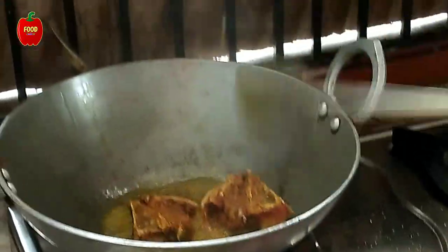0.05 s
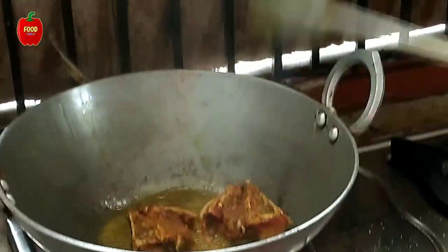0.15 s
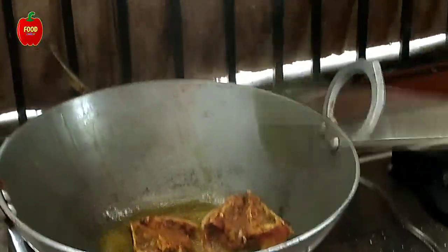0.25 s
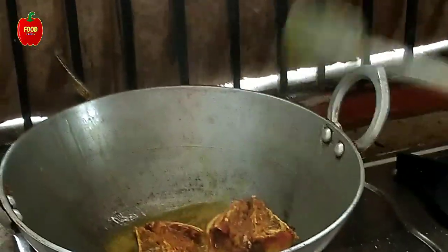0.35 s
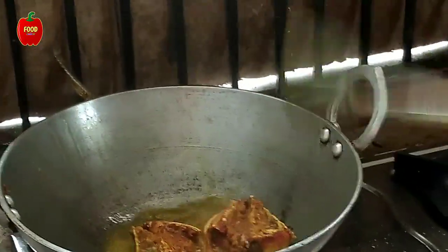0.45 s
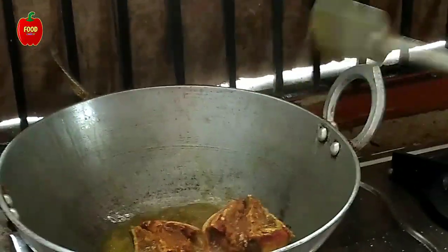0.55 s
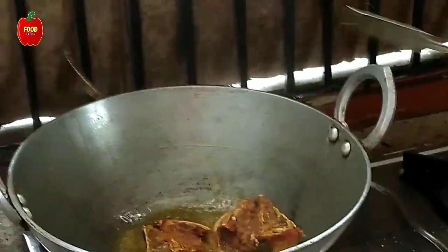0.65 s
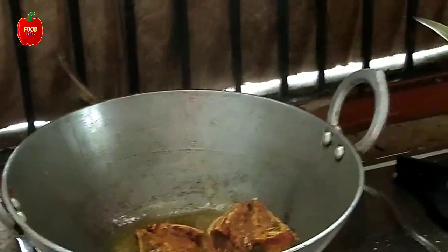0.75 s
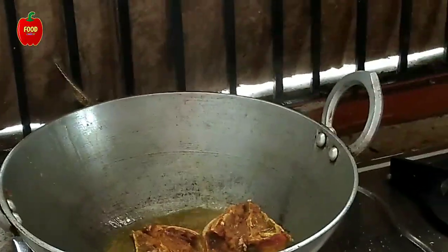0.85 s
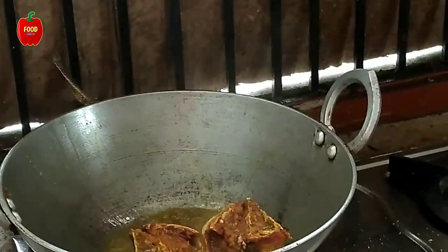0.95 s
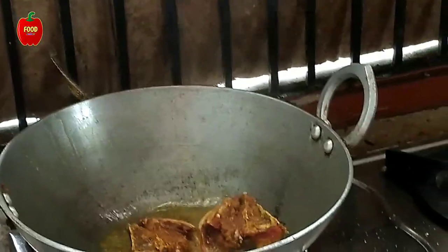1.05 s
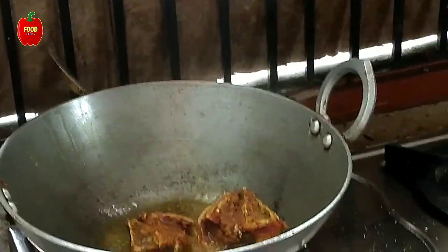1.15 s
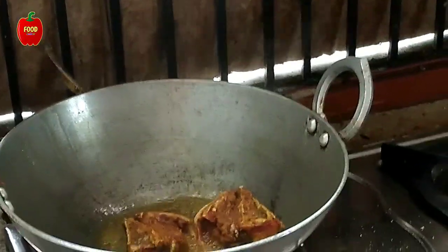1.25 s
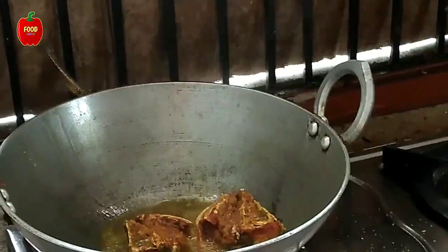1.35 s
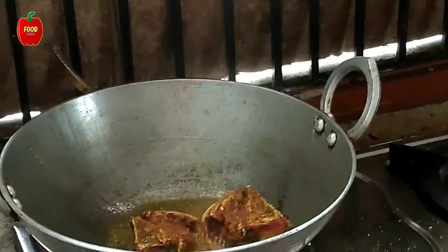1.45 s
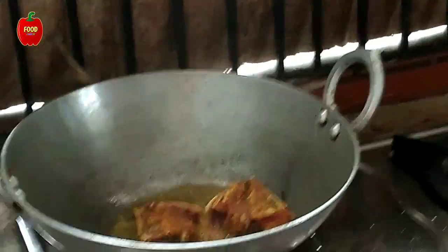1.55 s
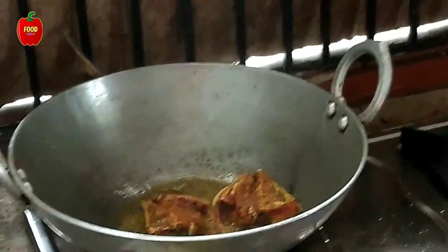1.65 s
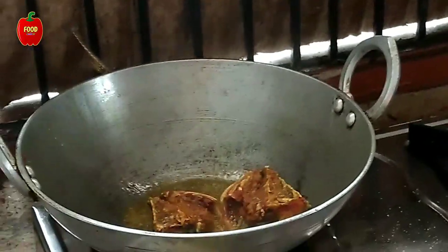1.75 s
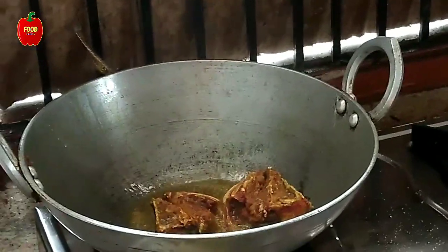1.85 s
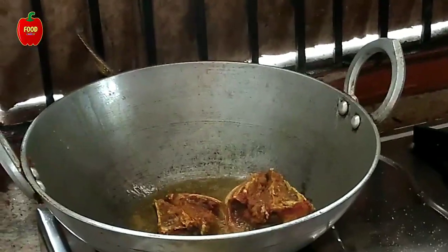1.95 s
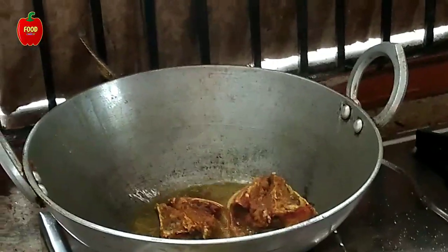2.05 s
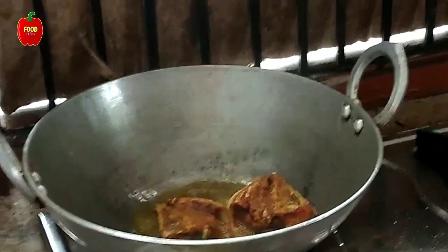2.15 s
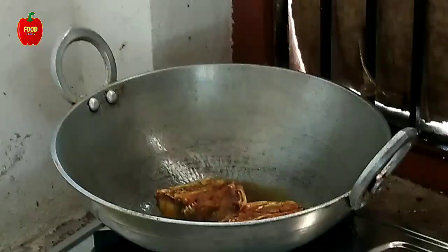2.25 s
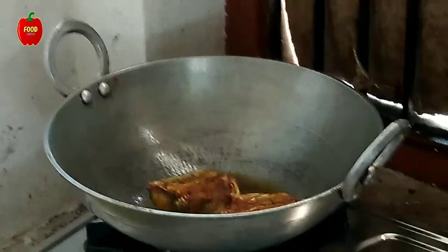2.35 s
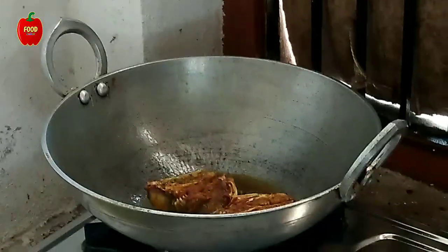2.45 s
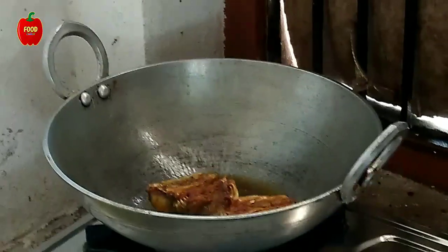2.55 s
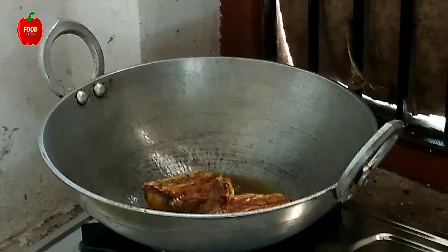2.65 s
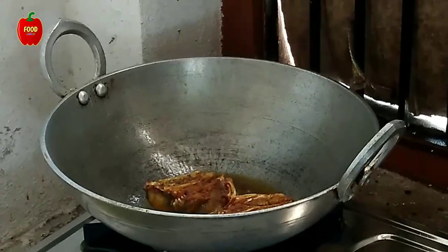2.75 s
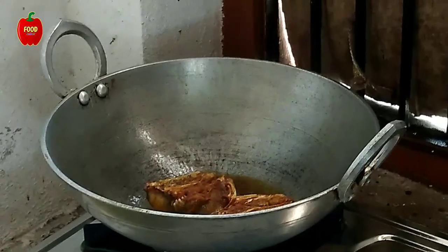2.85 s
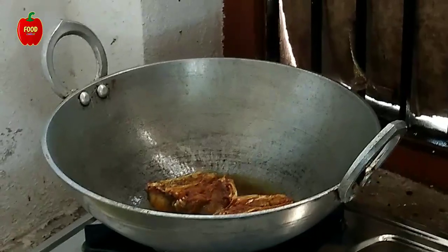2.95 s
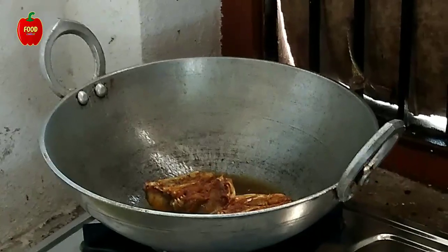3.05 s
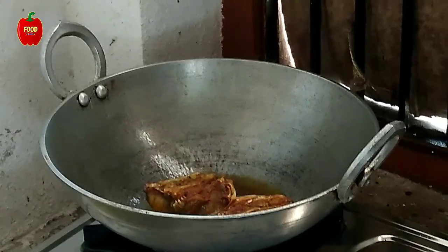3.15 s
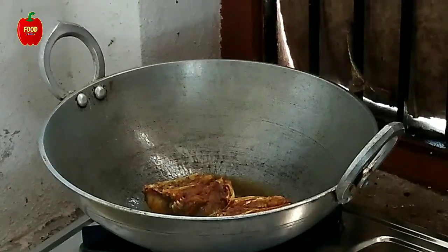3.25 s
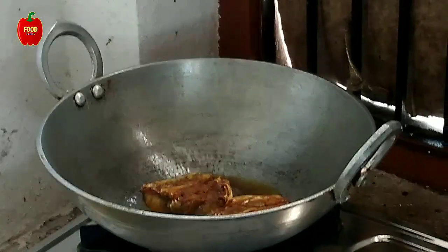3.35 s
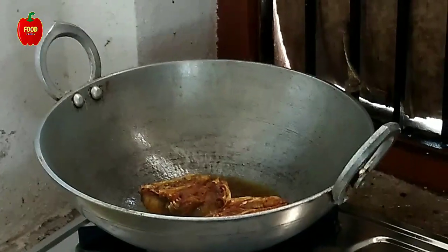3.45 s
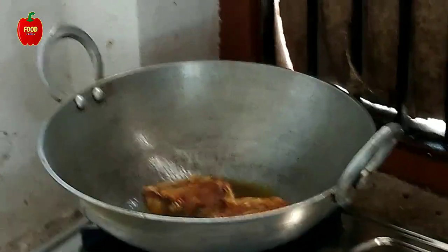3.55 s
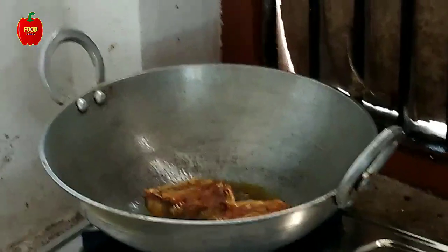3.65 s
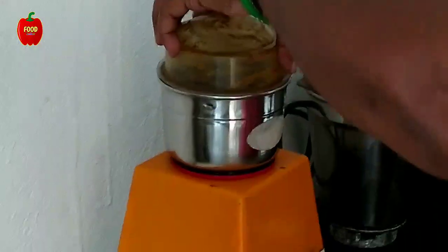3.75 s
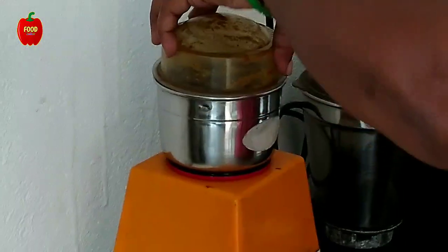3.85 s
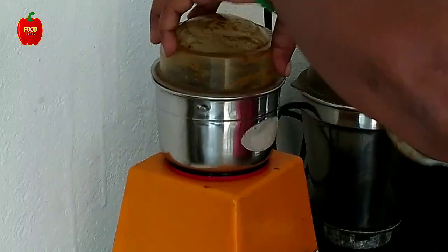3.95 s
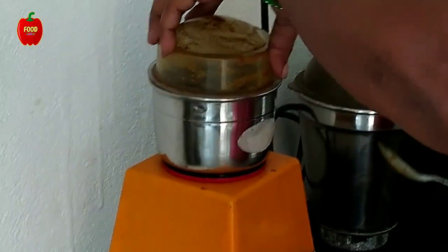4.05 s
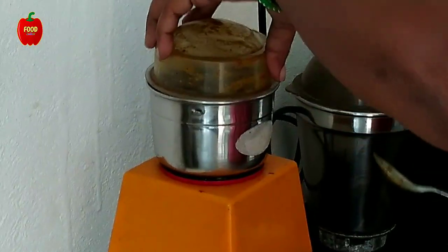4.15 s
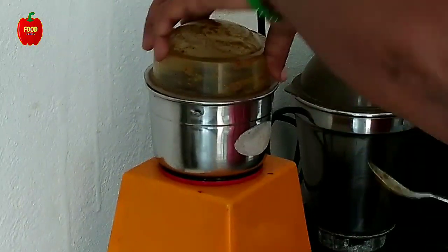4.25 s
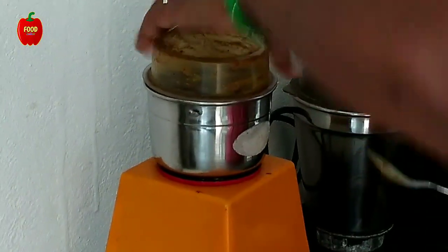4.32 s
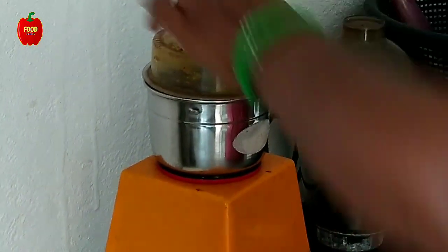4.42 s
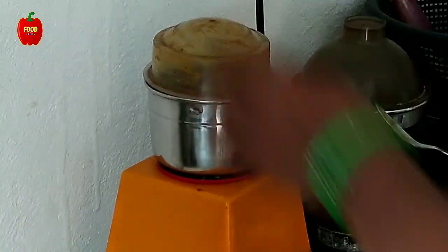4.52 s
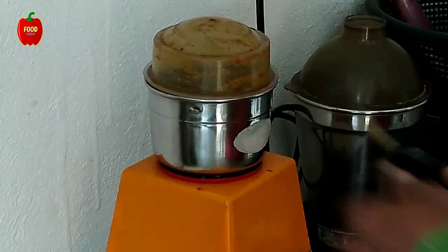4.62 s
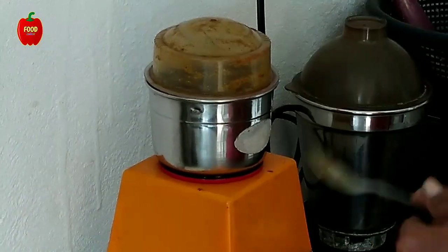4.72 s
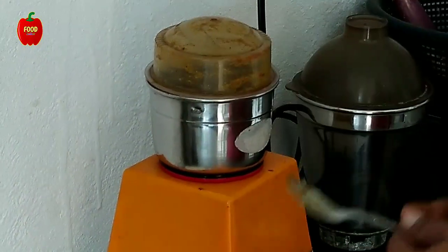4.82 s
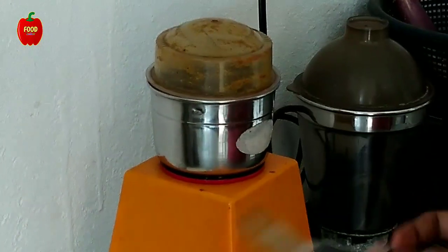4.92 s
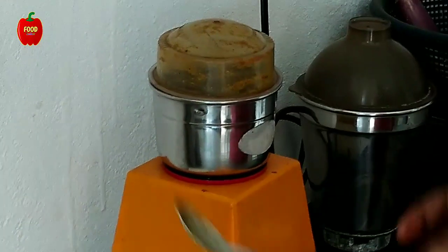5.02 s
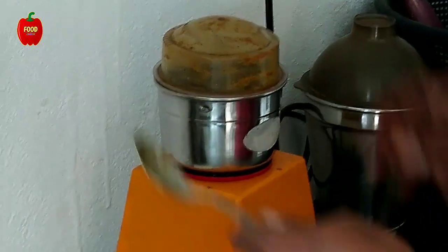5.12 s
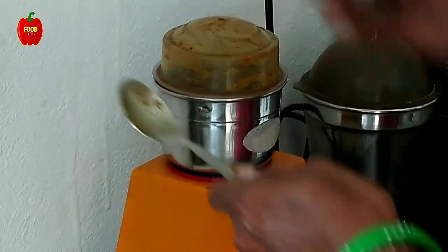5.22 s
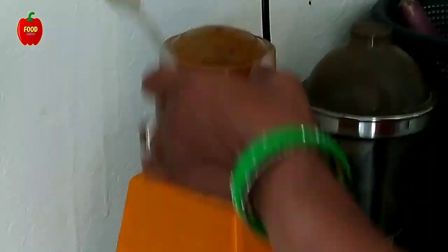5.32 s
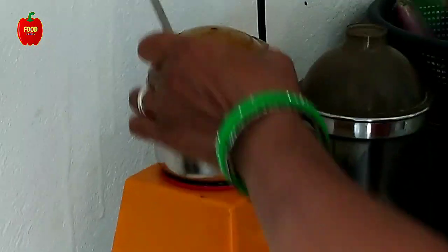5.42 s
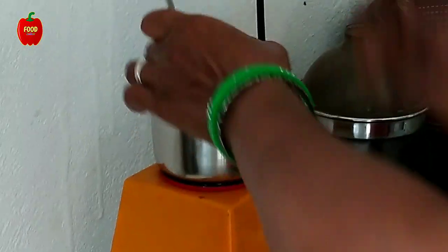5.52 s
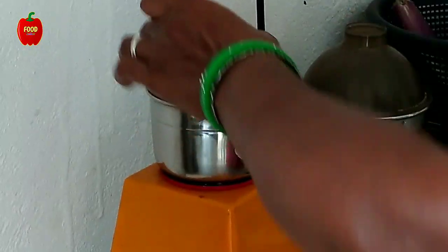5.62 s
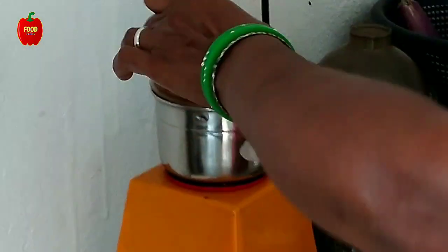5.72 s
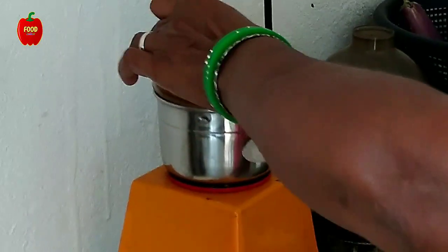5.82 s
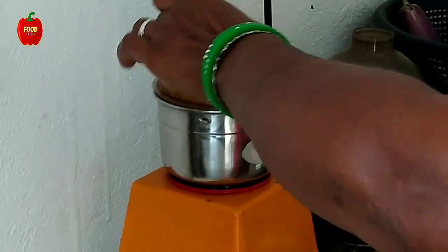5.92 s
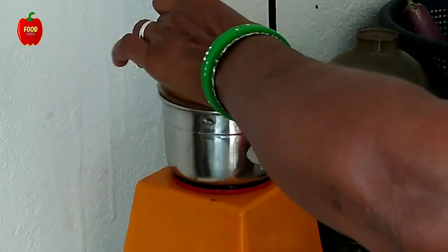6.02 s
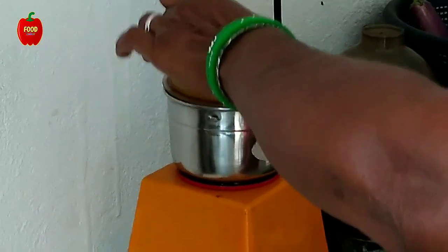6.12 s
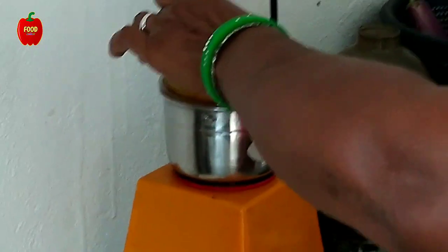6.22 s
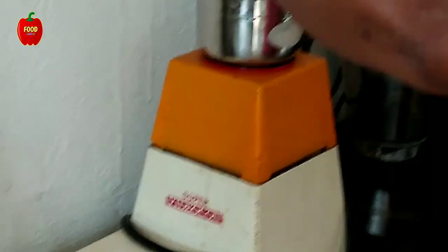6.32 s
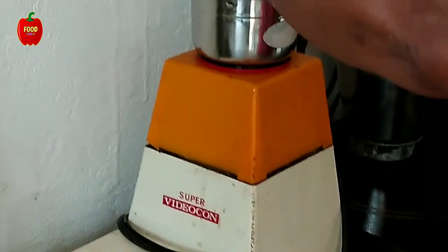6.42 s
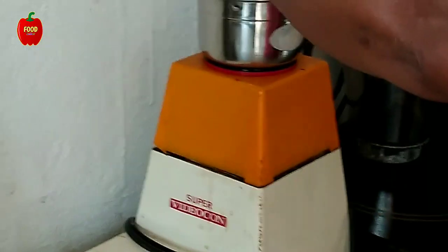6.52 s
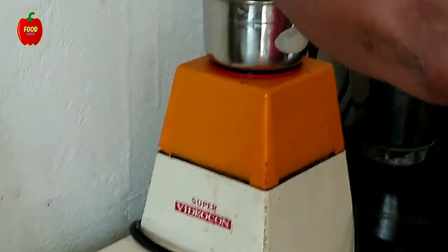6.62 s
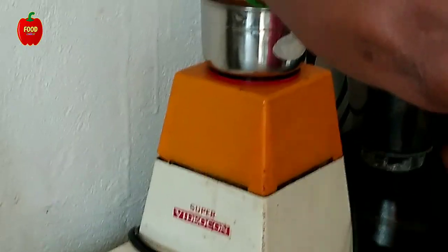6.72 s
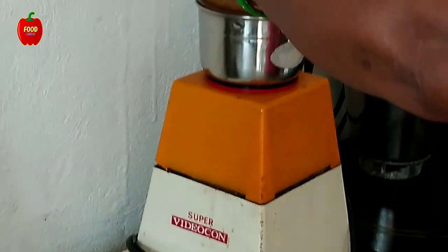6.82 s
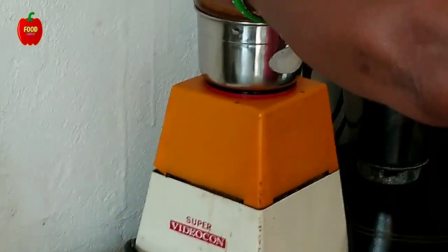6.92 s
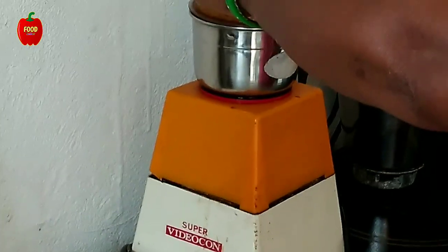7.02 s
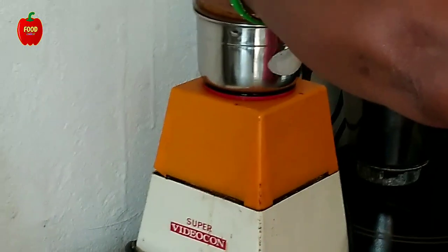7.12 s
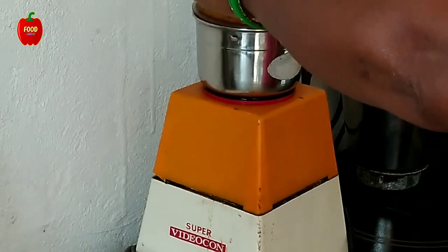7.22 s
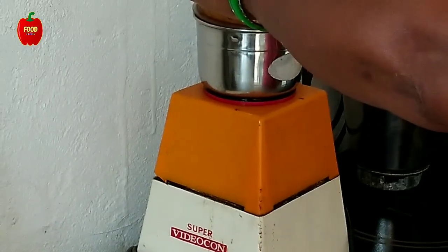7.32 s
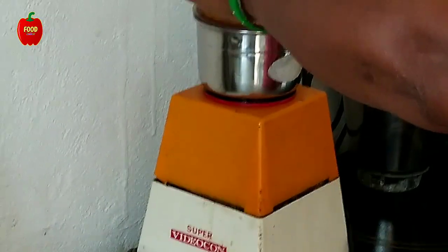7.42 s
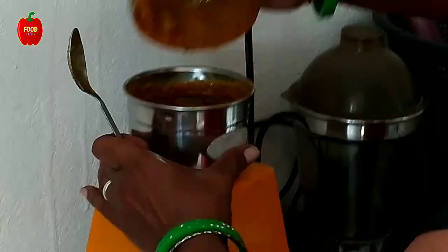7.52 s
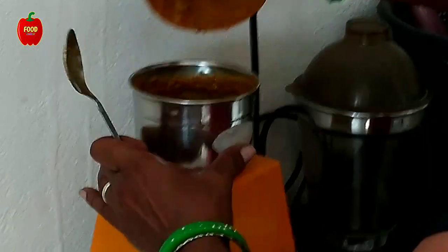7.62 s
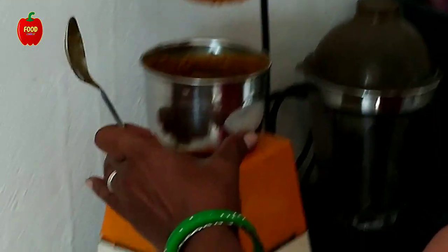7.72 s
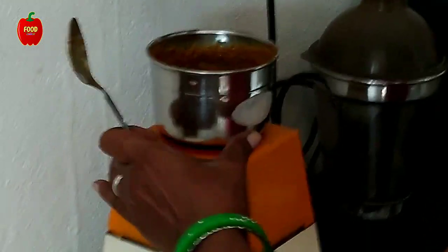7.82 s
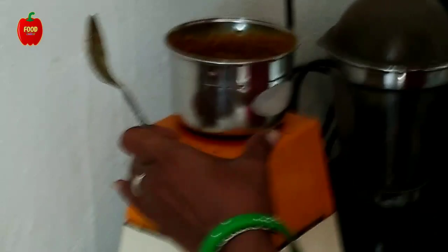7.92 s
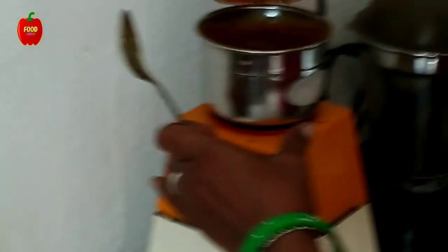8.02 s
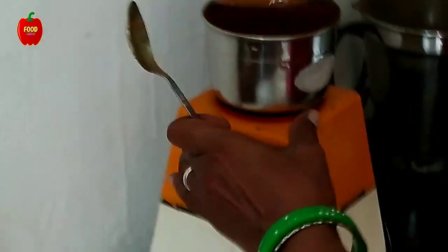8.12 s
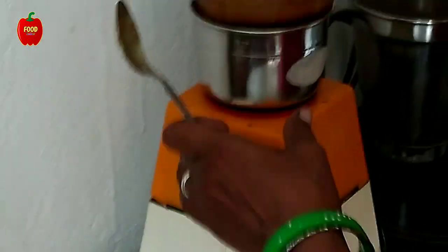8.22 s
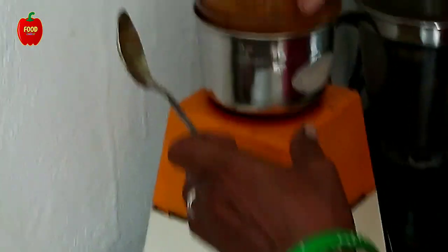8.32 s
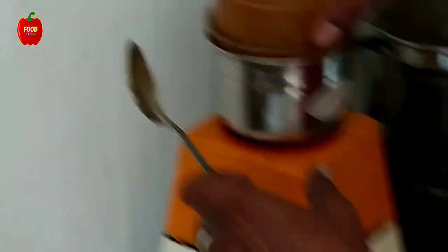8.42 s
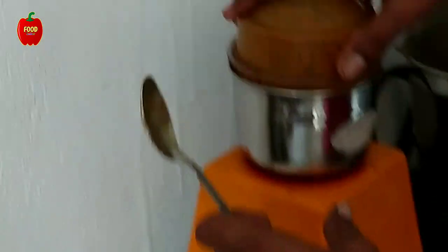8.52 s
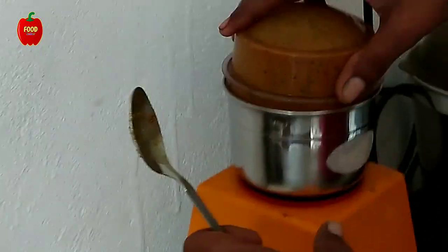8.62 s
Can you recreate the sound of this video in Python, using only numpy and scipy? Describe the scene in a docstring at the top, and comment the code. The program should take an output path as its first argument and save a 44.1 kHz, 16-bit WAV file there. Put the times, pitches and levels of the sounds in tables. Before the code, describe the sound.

Fish sizzles loudly in oil with spatula knocks on a steel pan, then fades across the kitchen as a mixer grinder whines, roars and slows down.

```python
"""Fish fries in oil in a round steel pan, heard close by while a spatula scrapes and knocks and water spits,
then from one side, then from across the kitchen, where a fan hums and a plastic lid is handled.
A mixer grinder starts, whines up to speed, is switched off and slows until it is cut off; the frying goes on.
Noise grains make the sizzle and grinding, struck resonances the knocks, shaft-locked sines the whine;
a pair of microphone ports hears it all."""
import sys
import numpy as np
from scipy import signal
from scipy.io import wavfile

SR = 44100
rng = np.random.default_rng(int(sys.argv[2]) if len(sys.argv) > 2 else 0)


def magnitude_from_level(level_db):
    """Linear magnitude for a level in decibels (20 dB per decade)."""
    exponent = np.asarray(level_db, float) / 20
    return 10 ** exponent


def file_out(sig):
    """Save sig as 16-bit WAV at sys.argv[1]."""
    # one column per channel
    cols = np.atleast_2d(sig).T
    # limit, then scale
    lim = np.clip(cols, -1, 1)
    pcm = np.round(lim * 32767).astype(np.int16)
    wavfile.write(sys.argv[1], SR, pcm)


N = 382347

# Times in seconds at which the microphone moves to a new standpoint.
MOVES_S = [2.12, 3.555, 6.5]
# Sizzle level. Each row: time in seconds, level in dB.
SIZZLE_LEVEL = [(0, -22.5), (1.1, -24.5), (2.115, -25.5), (2.125, -29.5), (2.5, -30), (2.6, -28),
                (3.05, -27.5), (3.548, -27.5), (3.56, -37.5), (4.1, -37.5), (4.45, -36.5), (5.1, -37),
                (7.3, -37.8), (8.67, -37.5)]
# Colour of the sizzle at each standpoint. Each row: frequency in Hz, relative density in dB per Hz.
SIZZLE_NEAR = [(210, -66), (350, -36), (493, -20), (525, -21.5), (567, -15), (623, -7), (799, -18),
               (878, -13.5), (1640, -11), (2740, -1.5), (4300, 0), (4950, -9.5), (8400, 4), (13400, -14),
               (14500, 3)]
SIZZLE_ASIDE = [(210, -54), (350, -33), (471, -19), (517, -28), (594, -9), (891, -12.5), (1320, -11.5),
                (2530, 1.5), (3050, -1.5), (4580, 0), (5350, -7), (8020, 3), (10100, -5.5), (13600, -13.5),
                (14500, -18)]
SIZZLE_FAR = [(210, -49), (350, -28), (422, -25), (604, -17), (763, -18.5), (1490, -18), (2450, -7),
              (3400, -11), (4440, -4), (5520, -13), (7190, -3), (8020, -4.5), (9820, -2.5), (11300, -15.5),
              (14500, -12.5)]
SIZZLE_LATE = [(210, -17.5), (350, -16), (525, -14.5), (695, -12), (1110, -14), (1690, -12.5), (2170, 1.5),
               (2610, -7.5), (3200, -5), (4370, -1), (6970, -6), (8020, 2), (9670, -3), (11000, -6.5),
               (14500, -12.5)]
# Port balance at the standpoints. Each row: frequency in Hz, left minus right in dB.
SIDES_NEAR = [(60, 9.0), (110, 28), (200, 40), (380, 10), (690, 0), (1270, -0.5), (2350, 1), (4330, -2),
              (7980, -2.5), (14700, 8)]
SIDES_ASIDE = [(60, 9.5), (110, 9.5), (200, 12.5), (380, 5), (690, 1.5), (1270, -1.5), (2350, -0.5),
               (4330, -3), (7980, -1.5), (14700, 15)]
SIDES_FAR = [(60, 15), (92, 14), (140, 12.6), (210, 15.3), (330, 14.7), (500, 1.5), (760, 1.0), (1160, 1.5),
             (1770, 9.8), (2710, 8), (4130, 1.3), (6310, 1.2), (9630, 11.5), (14700, 8.9)]
# Port balance of the mixer. Each row: frequency in Hz, left minus right in dB.
SIDES_MIXER = [(60, -4), (92, 13), (140, 21), (210, 11.5), (330, 13.5), (500, -2), (760, -1), (1160, -0.5),
               (1770, -4), (2710, 3), (4130, 0), (6310, -6.5), (9630, 6.5), (14700, 4)]
# Left-right likeness of pan and mixer. Each row: frequency in Hz, likeness 0-1.
ALIKE_PAN = [(60, 0.1), (130, 0.73), (220, 0.24), (600, 0.9), (900, 0.47), (1300, 0), (2500, .05),
             (8000, 0)]
ALIKE_MIXER = [(60, .35), (130, 1), (250, 1), (600, 0.69), (900, 0.75), (1300, 0.25), (2500, 0.13),
               (3500, 0.029), (8000, .02)]
# The oil flares up or slackens. Each row: centre in seconds, change in dB, length in seconds.
FLARES = [(.405, 1.5, 0.039), (.665, 0.5, 0.16), (1.017, 1.5, 0.074), (1.36, 0.5, .15), (1.942, 2, .08),
          (2.92, 0.5, 0.042), (3.216, 1, 0.059), (3.386, 0.5, 0.05), (3.686, -1.5, .06), (3.79, 2, 0.092),
          (3.895, -1.5, 0.053), (4.202, 1, .1), (4.345, -0.5, 0.042), (4.38, 0.5, 0.046),
          (4.537, 2.5, 0.11), (4.8, 0, .08), (4.905, -1, .06), (7.44, 1, 0.033), (7.874, 0.5, 0.13),
          (8.297, 2, .12), (8.375, -2, 0.062), (8.46, 2.5, 0.046), (8.56, 0.5, .06)]
GUSTS_DB, GUSTS_HZ = 0.52, 18
# Water spits in the oil; the first row is a short scrape.
# Each row: start in seconds, relative peak in dB, pitch in Hz, T60 in seconds.
SCRAPE_AND_SPITS = [(.398, -25, 2300, 0.23), (1.906, -19, 2700, 0.02), (1.94, -24, 3070, 0.053),
                    (3.93, -30, 7400, .02), (4.036, -26, 6550, .02), (4.16, -26, 9470, .015),
                    (4.2, -29, 4430, 0.052), (4.473, -31, 7100, .03)]

# Blows on the pan. Each row: time in seconds, relative peak in dB, dullness 0-1.
KNOCKS = [(0.205, -8, 0.66), (0.265, -20, 0.7), (0.311, -21, 0.1), (0.389, -22.5, 0.3), (0.629, -21.5, 0.7),
          (0.925, -28.5, 0.5), (1.318, -17.5, 0.9), (1.353, -18, 1), (1.425, -25, 0), (1.934, -33, 0.7),
          (2.099, -32, 0), (2.741, -31.5, 0.1), (2.92, -28, 0.2), (2.95, -26, 0.5), (3.36, -28, 0.2)]
# Modes of the pan. Each row: frequency in Hz, relative level in dB, T60 in seconds.
PAN_MODES = [(127, 6, 0.18), (185, -4.5, 0.16), (280, -14, .08), (350, -6.5, 0.046), (430, -5, 0.2),
             (511.5, 7, 0.035), (594, 2.5, 0.21), (650, 11, 0.055), (756, 2, 0.058), (853, 3.5, 0.055),
             (1040, 4.5, 0.015), (1320, -6.5, 0.039), (1555, -5, 0.029), (1760, -11.5, 0.016),
             (2300, 0, 0.01)]
CONTACT_S = 0.0007
ECHO_T60_S, ECHO_DB = 0.36, 1.5

# Shaft speed while powered. Each row: time in seconds, speed in turns per second.
SHAFT_SPEED = [(5.13, 160), (5.19, 183), (5.3, 197.5), (5.36, 208), (5.45, 219), (5.55, 227.5), (5.66, 234),
               (5.85, 240.5), (6.085, 244.8)]
SWITCH_OFF_S, CUT_OFF_S = 6.07, 7.318
FREE_TURNS_PER_S, END_TURNS_PER_S = 280, 10.4   # without load; where the slowing grinder is cut off
# Motor tones as multiples of the shaft speed, one per row of MOTOR_TONES.
TONE_MULTIPLES = [1, 2, 8, 10, 12, 14]
# Each row: level in dB, gain at full torque in dB, relative throb in level, throb in phase in rad.
MOTOR_TONES = [(-46, 0.5, 0.01, .03), (-38, 5.5, 0, .03), (-51, 0, 0.2, 0), (-36, 6, 0.1, 0.16),
               (-31.5, 7, 0.6, 0.099), (-39, -2, 0, .1)]
MAINS_THROB_HZ = 100
TONES_WAKE_S, TONES_WAKE_DB = 0.079, 38   # the tones climb out of the starting clatter
# Casing resonances. Each row: frequency in Hz, width in Hz, level over the plain path in dB.
CASING = [(240, 14, 16.5), (420, 10, 12), (477, 15, -4), (2258, 23, 8), (2622, 33, 16.5), (2770, 18, 11),
          (3320, 110, 8.5)]

# Colour of the roar, powered and coasting. Each row: frequency in Hz, relative density in dB per Hz.
ROAR_POWERED = [(29, -68), (50, -44), (130, -25), (235, -5), (269, -10), (384, -3.5), (459, -6), (517, -3),
                (627, -2.5), (686, -7.5), (965, -1.5), (1120, -15), (1260, -3.5), (1750, -4.5), (2280, -35),
                (3850, -120)]
ROAR_COASTING = [(29, -76), (50, -23), (144, -20.5), (199, -1.5), (257, -3), (285, -8.5), (356, -4),
                 (582, -6.5), (717, -10), (807, -3), (1070, -11.5), (1340, -4), (1670, -9), (1750, -11),
                 (2280, -38), (3850, -120)]
# Housing resonances in the roar. Each row: frequency in Hz, relative width in Hz,
# relative level in dB powered, relative level in dB coasting.
HOUSING = [(290, 19, -8, 0), (350, 9.7, -16, -5), (416.5, 11, -8.5, -10), (459.2, 19, -4, -6),
           (621, 16, -3, -8), (806, 11, -19, -14), (986, 42, -2, -3), (1303, 9, -1, -5.5)]
# Jar resonances. Each row: frequency in Hz, relative width in Hz, relative level in dB.
JAR = [(1780, 630, -9.5), (1906, 120, 4.5), (2050, 127, 8), (2184, 185, 2.5), (2310, 130, -8.5),
       (2560, 55, -23), (3090, 270, -15)]
# Colour of the cooling-fan hiss. Each row: frequency in Hz, relative density in dB per Hz.
HISS = [(2120, -1), (3600, 0), (3980, -6), (4600, -3), (4990, -15.5), (5940, -9.5), (7250, -7),
        (8240, -5.5), (10500, -12.5), (13700, -17), (14500, -23)]
# Lean of the rattle. Each row: time in seconds, left minus right in dB.
RATTLE_LEAN = [(5.13, 16), (5.32, -1), (6.17, 10.5), (6.68, 11.5), (7.14, 9)]
# Level laws. Each holds: dB at full speed, dB per tenfold speed, dB gained at full torque, dB step at switch-off.
ROAR_LAW = (-27, 23.5, 6, 0.5)
RATTLE_LAW = (-21, 27.5, -0.5, -0.5)
HISS_LAW = (-24.5, 22, -2, -4.5)
BITE_S, BITE_DB = 0.14, 9   # the blades take a moment to throw hard bits at the jar
# Lumps pass the blades. Each row: centre in seconds, length in seconds, roar change in dB, rattle change in dB.
SURGES = [(5.239, 0.021, 6.5, -7), (5.261, 0.035, -5.5, 9), (5.314, 0.058, 3, 2.5), (5.542, 0.033, 0.5, -1),
          (5.71, .06, 1.5, 1.5), (5.885, 0.056, -2.5, 1), (6.022, 0.068, -2, 2.5), (6.052, .03, 0.5, -3.5),
          (6.11, 0.035, 0, -1.5), (6.125, 0.014, -0.5, 8), (6.24, 0.026, 2, -0.5), (6.48, 0.049, 5.5, 1.5),
          (6.562, 0.066, 5.5, 3), (6.661, 0.047, 4, 6.5), (6.754, 0.043, 1.5, 1), (6.884, .08, 4, 3.5),
          (7.15, 0.042, 3, 1)]
# The blades run free, then catch. Each row: catch in seconds, length in seconds, depth in dB.
LULLS = [(5.327, 0.025, 9), (5.474, 0.043, 1), (5.774, 0.045, 3), (6.188, 0.08, 4.5), (6.307, .07, 3.5),
         (6.438, .1, 0.5), (6.518, 0.035, 8.5), (6.618, 0.065, 8.5), (6.73, 0.04, 4), (6.851, 0.054, 10.5),
         (7.032, 0.054, -1.5), (7.237, 0.067, 3)]
CATCH_S, HISS_SAG_SHARE = 0.01, 0.71
# Hard bits strike the jar wall. Each row: time in seconds, relative peak in dB.
STRIKES = [(6.5314, -16), (6.7426, -18), (6.8578, -26), (6.8658, -14), (6.902, -25), (6.9127, -22)]
STRIKE_T60_S = 0.039
# The grinder jolts on its feet. Each row: start in seconds, relative peak in dB, pitch in Hz, T60 in seconds.
JOLTS = [(5.137, -32, 1530, .04), (5.14, -18, 441, 0.39), (5.18, -22, 357, 0.2), (5.275, -15.5, 970, 0.37),
         (5.28, -20.5, 770, 0.38), (5.7, -23, 940, 0.32), (6.06, -30, 70, .15), (6.07, -33, 131, 0.1),
         (6.085, -20, 350, 0.22), (6.21, -23, 385, 0.15), (6.74, -22, 1390, .08), (7.13, -32, 610, 0.086)]

# The plastic lid is handled. Each row: start in seconds, relative peak in dB, pitch in Hz, T60 in seconds.
LID_THUDS = [(3.7, -52, 300, 0.092), (3.88, -52, 290, 0.24), (4.22, -49, 282, 0.095),
             (8.05, -44.5, 264, 0.087), (8.158, -46.5, 370, 0.22), (8.56, -43, 240, 0.066),
             (8.57, -45, 430, .07)]
# Start and end of the fan hum in seconds.
FAN_SPAN_S = (3.56, 5.12)
FAN_TURNS_PER_S = 47
# Fan harmonics. Each row: multiple of the turning rate, relative level in dB, change in dB per second.
FAN_ORDERS = [(2, -66, 1), (3, -61.5, 0), (4, -62, -9), (5, -68, -6)]
# Colour of the low rumble, away from and by the stove. Each row: frequency in Hz, relative density in dB per Hz.
RUMBLE_AWAY = [(24, -63), (40, -33), (54, -29), (85, 4), (130, 1.5), (178, -9), (230, -2), (265, -7),
               (366, -7), (420, -30), (550, -45), (920, -120)]
RUMBLE_NEAR = [(24, -45), (40, -15), (65, -6), (124, -1), (141, -1.5), (162, -6), (189, -2.5), (226, -3.5),
               (313, -7.5), (420, -8), (550, -24), (920, -120)]
# Relative rumble level in dB, one per standpoint.
RUMBLE_DB = [-58, -60, -59.5, -55.5]
# Low thump under the pan knocks, and slow changes of the rumble.
# Each row: centre in seconds, change in dB, length in seconds.
LOW_CHANGES = [(.15, 3, .5), (1.352, 9.5, 0.25), (1.95, 3, .3), (3.8, 5.5, 0.52), (7.3, -2, 0.19)]
LOW_CUT_HZ, TOP_HZ, CEILING = 118, 14620, 0.86


def rms_one(x):
    """Scaled to rms 1."""
    return x / np.sqrt(np.mean(x ** 2) + 1e-20)


def in_time(rows):
    """Each column of a table as a curve over all samples."""
    s, *columns = np.transpose(rows)
    return [np.interp(np.arange(N) / SR, s, c) for c in columns]


def sounding(start_s, end_s):
    """1 between two times, 0 outside, with 10 ms edges."""
    t = np.arange(N) / SR
    return np.clip(np.minimum(t - start_s, end_s - t) / 0.01, 0, 1)


def at_hz(points, hz):
    """A spectrum read on a log-frequency axis."""
    points_hz, value = np.transpose(points)
    return np.interp(np.log(hz), np.log(points_hz), value)


def port_gains(lean_db):
    """Left and right gains for a left-minus-right difference in dB."""
    return magnitude_from_level(np.array([[.5], [-.5]]) * lean_db)


def drift(rate_hz):
    """Slow chance of spread 1: noise through a double pole, made at SR / 40."""
    r = np.exp(-80 * np.pi * rate_hz / SR)
    noise = rng.standard_normal(N // 40 + 2002)
    slow = signal.lfilter([1], [1, -2 * r, r * r], noise)[2000:]   # settled part
    return np.interp(np.arange(N) / 40, np.arange(len(slow)), rms_one(slow))


def bumps(at_s, height_db, length_s):
    """A level curve in dB: one smooth hump per event."""
    t = np.arange(0, N + 40, 40) / SR
    humps = height_db * np.exp(-8 * ((t[:, None] - at_s) / (2 * length_s)) ** 2)
    return np.interp(np.arange(N) / SR, t, humps.sum(axis=1))


def grains(per_s, spread_db, channels):
    """Random clicks of random sign, a few of them much larger."""
    size_db = spread_db * np.minimum(rng.exponential(1, (channels, N)), 5)
    sizes = magnitude_from_level(size_db) * rng.choice([-1, 1], (channels, N))
    present = rng.random((channels, N)) < per_s / SR
    return rms_one(sizes * present + 1e-9)


def resonance(x, hz, width_hz):
    """Two-pole resonance of gain 1 on top."""
    r = np.exp(-np.pi * width_hz / SR)
    b = np.array([1, 0, -1]) * (1 - r * r) / 2
    return signal.lfilter(b, [1, -2 * r * np.cos(2 * np.pi * hz / SR), r * r], x)


def stereo(mid, side, hz, alike, lean_db):
    """Two signals mixed to the likeness of the ports at this pitch, then panned."""
    c = np.clip(at_hz(alike, hz), 0, .99)
    pair = np.sqrt(1 + c) * mid + np.sqrt(1 - c) * side * np.array([[1], [-1]])
    return pair * port_gains(lean_db)


def banded(trains, spectra, sides, alike, patchy_db, place=0):
    """Fifth-octave bands of four noise trains; colour and pan follow the place; about rms 1 at each."""
    low, high = spectra[0][0][0], spectra[0][-1][0]
    edges = np.geomspace(low, high, int(5 * np.log2(high / low)) + 2)
    out, power = 0, 0
    for k, band in enumerate(zip(edges, edges[1:])):
        sos = signal.butter(2, band, "band", fs=SR, output="sos")
        pair = trains[2 * (k % 2):][:2]   # neighbouring bands use different trains
        mid, side = signal.sosfilt(sos, pair)
        hz = np.sqrt(band[0] * band[1])
        gain = magnitude_from_level([at_hz(s, hz) for s in spectra])
        lean_db = np.array([at_hz(s, hz) for s in sides])
        loudness = gain * np.cosh(lean_db * np.log(10) / 40)
        power = power + loudness ** 2 * (band[1] - band[0]) / SR * 2
        patchy = magnitude_from_level(patchy_db * (3000 / hz) ** 0.18 * drift(6.8))
        out = out + gain[place] * patchy * stereo(mid, side, hz, alike, lean_db[place])
    return out / np.sqrt(power)[place]


def puffs(events, breadth):
    """Each event is a burst of dying noise around its own pitch; breadth is width over pitch."""
    out = np.zeros((2, N))
    age_s = np.arange(SR // 4) / SR
    for s, peak_db, hz, t60_s in events:
        mid, side = resonance(rng.standard_normal((2, SR // 4)), hz, breadth * hz)
        lean_db = at_hz(SIDES_FAR if s > MOVES_S[1] else SIDES_NEAR, hz)
        puff = stereo(rms_one(mid), rms_one(side), hz, ALIKE_PAN, lean_db)
        onset = np.minimum(age_s * hz / 3, 1)   # three cycles
        puff = puff * magnitude_from_level(peak_db - 1.5 - 60 * age_s / t60_s) * onset
        at = int(s * SR)
        out[:, at:at + SR // 4] += puff[:, :N - at]
    return out


def standpoint():
    """Index of the standpoint at each sample."""
    return np.searchsorted(MOVES_S, np.arange(N) / SR)


def frying():
    """Steam bubbles burst by the thousand, in gusts."""
    bursts = grains(14000.0, spread_db=2.5, channels=4) * magnitude_from_level(0.4 * drift(33))
    colours = [SIZZLE_NEAR, SIZZLE_ASIDE, SIZZLE_FAR, SIZZLE_LATE]
    sides = [SIDES_NEAR, SIDES_ASIDE, SIDES_FAR, SIDES_FAR]
    sizzle = banded(bursts, colours, sides, ALIKE_PAN, 1.0, standpoint())
    gusts_db = GUSTS_DB * drift(GUSTS_HZ)
    return magnitude_from_level(in_time(SIZZLE_LEVEL)[0] + bumps(*np.transpose(FLARES)) + gusts_db) * sizzle


def scrape_and_spits():
    """A short scrape, then water spitting in the oil: broad bursts of dying noise."""
    return puffs(SCRAPE_AND_SPITS, breadth=0.18)


def knocks():
    """Each blow strikes every mode with a new strength; dull blows favour the low modes. The room answers."""
    s, peak_db, dull = np.transpose(KNOCKS)
    chance_db = rng.normal(0, 2.44, (len(s), len(PAN_MODES)))
    give = np.exp(-2 * np.pi / (CONTACT_S * SR))
    out = 0
    for k, (hz, level_db, t60_s) in enumerate(PAN_MODES):
        clicks = np.full(N, 1e-18)
        tilt_db = -5.8 * (dull - 2.5) * np.log2(hz / 600)
        strike_db = peak_db + level_db - 22.5 + tilt_db + chance_db[:, k]
        clicks[((s + .004) * SR).astype(int)] = magnitude_from_level(strike_db)   # 4 ms after the table time
        r, w = magnitude_from_level(-60 / (t60_s * SR)), 2 * np.pi * hz / SR
        soft = signal.lfilter([1 - give], [1, -give], clicks)   # the contact lasts a moment
        rung = signal.lfilter([.5, 0, -.5], [1, -2 * r * np.cos(w), r * r], soft)
        out = out + rung * port_gains(at_hz(SIDES_NEAR, hz))
    decay = magnitude_from_level(ECHO_DB - 60 * np.arange(SR // 2) / SR / ECHO_T60_S)
    tail = rng.standard_normal((2, SR // 2)) * decay / np.sqrt(ECHO_T60_S * SR / 14)
    return out + signal.fftconvolve(out, tail, axes=1)[:, :N]


def shaft():
    """Speed in turns per s, slowing evenly until it is cut off; torque 0-1, falling towards free speed."""
    speed = in_time(SHAFT_SPEED + [(CUT_OFF_S, END_TURNS_PER_S)])[0]
    torque = np.clip((FREE_TURNS_PER_S - speed) / (FREE_TURNS_PER_S - SHAFT_SPEED[1][1]), 0, 1)
    return speed, torque * (np.arange(N) / SR < SHAFT_SPEED[-1][0])


def motor():
    """Shaft-locked tones; torque throbs at twice the mains rate; the casing lifts tones crossing its modes."""
    speed, torque = shaft()
    t = np.arange(N) / SR
    start_s, (end_s, full_speed) = SHAFT_SPEED[0][0], SHAFT_SPEED[-1]
    turns = np.cumsum(speed * (1 + .0015 * drift(25))) / SR
    throb, lagging = np.cos(2 * np.pi * MAINS_THROB_HZ * t), np.sin(2 * np.pi * MAINS_THROB_HZ * t)
    load = np.clip((242 - speed) / 16, .1, 1)   # the throb eases as the motor nears full speed
    out = 0
    for multiple, (level_db, torque_db, depth, swing_rad) in zip(TONE_MULTIPLES, MOTOR_TONES):
        port_db = 2.4 * np.array([drift(10), drift(5.3)])
        wobble_db = (multiple / 12) ** .3 * (port_db + 2.8 * drift(40))
        level = magnitude_from_level(level_db + torque_db * torque + wobble_db)
        lean = port_gains(at_hz(SIDES_MIXER, multiple * full_speed))
        port_turns = multiple * np.array([[0], [.008]])
        phase = 2 * np.pi * (multiple * turns + rng.random() + port_turns)
        # level and phase throbbing together favour the lower side tone
        tone = (1 + 2 * depth * load * throb) * np.sin(phase - swing_rad * load * lagging)
        out = out + level * lean * tone
    waking = magnitude_from_level(-TONES_WAKE_DB * np.clip(1 - (t - start_s) / TONES_WAKE_S, 0, 1))
    out = out * waking * sounding(start_s, end_s)
    return out + sum(magnitude_from_level(lift_db) * resonance(out, hz, width_hz) for hz, width_hz, lift_db in CASING)


def grinding_levels():
    """Roar, rattle and hiss in dB follow speed and torque; lumps add surges, free running makes lulls."""
    speed, torque = shaft()
    t = np.arange(N) / SR
    tenfolds = np.log10(speed / SHAFT_SPEED[-1][1])

    def law(full_db, slope_db, torque_db, step_db):
        """Level from speed, torque and the switch."""
        return full_db + slope_db * tenfolds + torque_db * torque + step_db * (t > SWITCH_OFF_S)

    sag_db = sum(np.interp(t, [s - length_s, s, s + CATCH_S], [0, depth_db, 0])
                 for s, length_s, depth_db in LULLS)
    s, length_s, roar_surge_db, rattle_surge_db = np.transpose(SURGES)
    bite_db = BITE_DB * np.clip(1 - (t - SHAFT_SPEED[0][0]) / BITE_S, 0, 1)
    roar_db = law(*ROAR_LAW) + bumps(s, roar_surge_db, length_s) - sag_db
    rattle_db = law(*RATTLE_LAW) - bite_db + bumps(s, rattle_surge_db, length_s) - sag_db
    return roar_db, rattle_db, law(*HISS_LAW) - HISS_SAG_SHARE * sag_db


def paste_roar():
    """Paste thrown about roars in the housing: grains in bands and in the housing modes."""
    lumps = grains(5000.0, spread_db=2.6, channels=4) * magnitude_from_level(.6 * drift(30))
    coasting = (np.arange(N) / SR > SWITCH_OFF_S).astype(int)
    roar = banded(lumps, [ROAR_POWERED, ROAR_COASTING], [SIDES_MIXER] * 2, ALIKE_MIXER, 0.59, coasting)
    for hz, width_hz, *level_db in HOUSING:
        mid, side = resonance(resonance(lumps[:2], hz, 1.1 * width_hz), hz, 1.1 * width_hz)
        level = magnitude_from_level(np.array(level_db)[coasting] - 9.5 + 2.0 * drift(8.4))
        lean_db = at_hz(SIDES_MIXER, hz)
        roar = roar + level * stereo(rms_one(mid), rms_one(side), hz, ALIKE_MIXER, lean_db)
    return roar


def jar_rattle():
    """Hard bits and the loose coupling rattle the steel jar: grains ring its modes."""
    hits = grains(2500.0, spread_db=3.0, channels=2) * magnitude_from_level(0.89 * drift(40))
    rattle = 0
    for hz, width_hz, level_db in JAR:
        fresh = hits * rng.normal(1, 0.68, (2, N))   # every hit lands elsewhere on the wall
        mid, side = resonance(resonance(fresh, hz, 1.47 * width_hz), hz, 1.47 * width_hz)
        rattle = rattle + magnitude_from_level(level_db) * stereo(mid, side, hz, ALIKE_MIXER, 0)
    return rattle / np.std(rattle.mean(axis=0)) * port_gains(in_time(RATTLE_LEAN)[0])


def cooling_hiss():
    """The cooling fan hisses: dense grains in bands."""
    return banded(grains(12000.0, spread_db=3.0, channels=4), [HISS], [SIDES_MIXER], ALIKE_MIXER, 2.3)


def grinding():
    """Roar, rattle and hiss, each at its level, from the start to the cut-off."""
    roar_db, rattle_db, hiss_db = grinding_levels()
    mix = magnitude_from_level(roar_db) * paste_roar() + magnitude_from_level(rattle_db) * jar_rattle() + magnitude_from_level(hiss_db) * cooling_hiss()
    return sounding(SHAFT_SPEED[0][0], CUT_OFF_S) * mix


def strikes():
    """Single clicks ring the jar briefly."""
    s, peak_db = np.transpose(STRIKES)
    chance_db = rng.normal(0, 2.4, (len(s), len(JAR)))
    r = magnitude_from_level(-60 / (STRIKE_T60_S * SR))
    out = 0
    for k, (hz, _, level_db) in enumerate(JAR):
        clicks, w = np.full(N, 1e-18), 2 * np.pi * hz / SR
        clicks[(s * SR).astype(int)] = magnitude_from_level(peak_db + level_db - 10 + chance_db[:, k])
        out = out + signal.lfilter([0, np.sin(w)], [1, -2 * r * np.cos(w), r * r], clicks)
    return resonance(out, hz=2050, width_hz=740) * port_gains(in_time(RATTLE_LEAN)[0])


def jolts():
    """The grinder jolts on its feet: narrow bursts of noise, almost pitched."""
    return puffs(JOLTS, breadth=0.027)


def lid_thuds():
    """The plastic lid is handled: soft low bursts of noise."""
    return puffs(LID_THUDS, breadth=0.14)


def fan():
    """Wavering low hum at multiples of the turning rate, stronger on the left."""
    turns = np.cumsum(FAN_TURNS_PER_S + 0.29 * drift(5.4)) / SR
    age_s = np.maximum(np.arange(N) / SR - FAN_SPAN_S[0], 0)
    hum = 0
    for multiple, level_db, fade_db_per_s in FAN_ORDERS:
        level = magnitude_from_level(level_db + fade_db_per_s * age_s + 0.81 * drift(6.6))
        tone = np.sin(2 * np.pi * (round(multiple) * turns + rng.random()))
        hum = hum + level * np.sqrt(2) * tone
    return sounding(*FAN_SPAN_S) * hum * magnitude_from_level([[4], [-10]])


def low_rumble():
    """Dull rumble of the kitchen and the low thump under the pan knocks: noise in low bands."""
    place = standpoint()
    by_stove = (place < 2).astype(int)
    noise = rng.standard_normal((4, N))
    rumble = banded(noise, [RUMBLE_AWAY, RUMBLE_NEAR], [SIDES_FAR] * 2, ALIKE_PAN, 2.0, by_stove)
    return magnitude_from_level(np.array(RUMBLE_DB)[place] - 5 + bumps(*np.transpose(LOW_CHANGES))) * rumble


def scene():
    """Pan, grinder, lid and fan in one kitchen."""
    pan = frying() + scrape_and_spits() + knocks()
    grinder = motor() + grinding() + strikes() + jolts()
    return pan + grinder + lid_thuds() + fan() + low_rumble()


def roll_off(x):
    """The treble ends steeply here."""
    return signal.sosfilt(signal.butter(12, 15300, fs=SR, output="sos"), x)


def record(dry):
    """The microphone drops the deep bass and rounds the peaks; the top is cut."""
    thin = signal.sosfilt(signal.butter(2, LOW_CUT_HZ, "high", fs=SR, output="sos"), dry)
    soft = CEILING * np.tanh(thin / CEILING)
    mix = signal.sosfilt(signal.cheby2(16, 55, TOP_HZ, fs=SR, output="sos"), soft)
    return roll_off(mix)


dry = scene()
out = record(dry)
file_out(out)
```